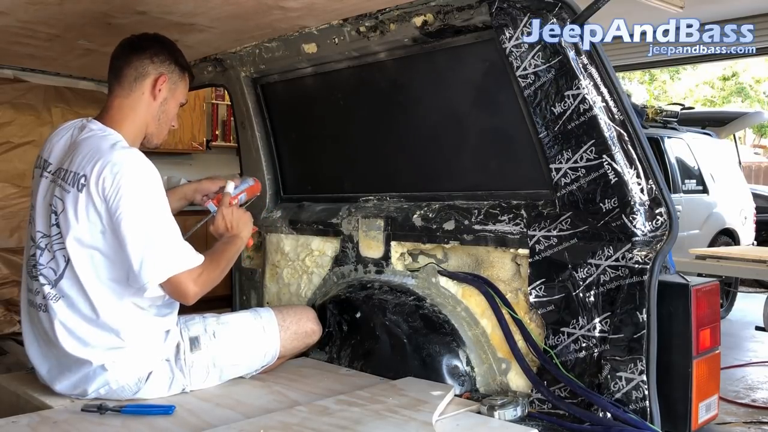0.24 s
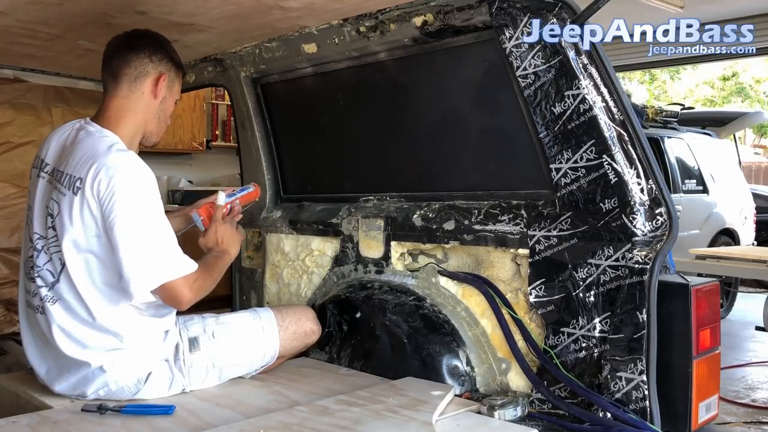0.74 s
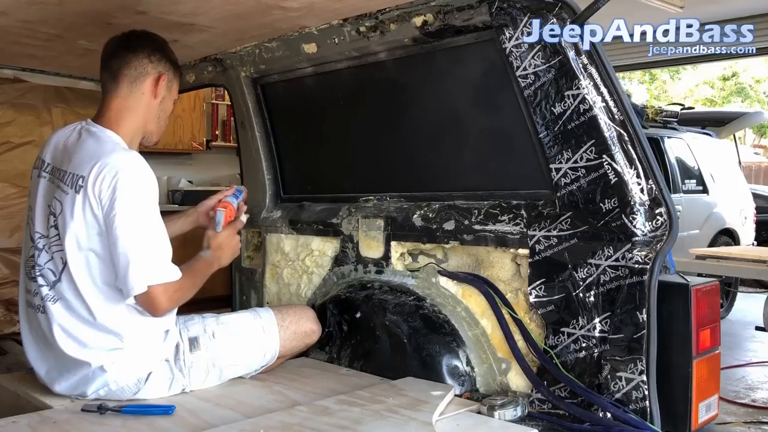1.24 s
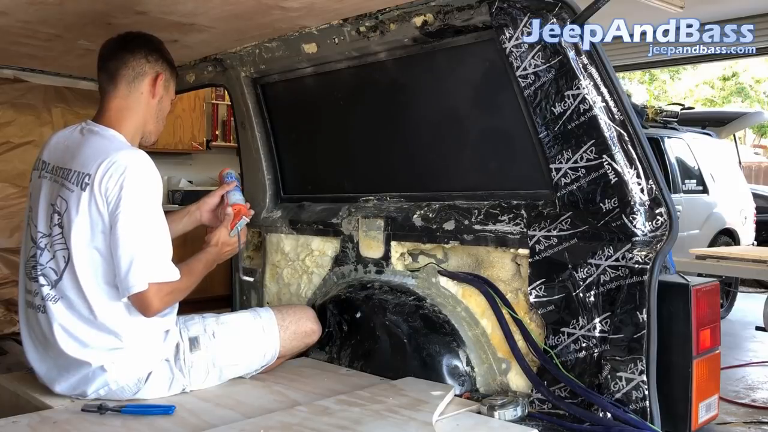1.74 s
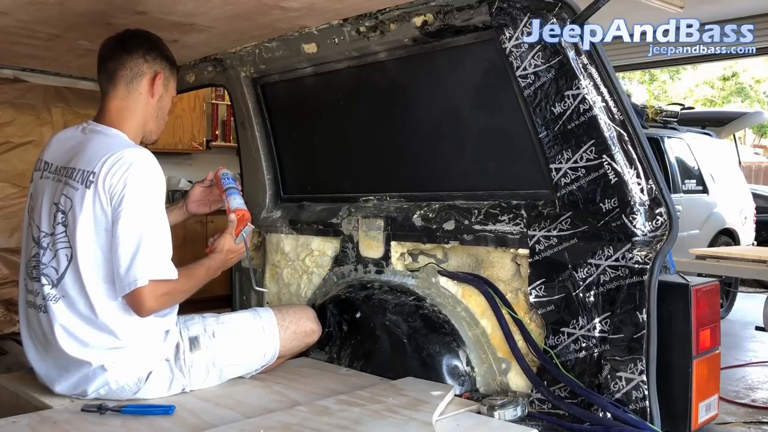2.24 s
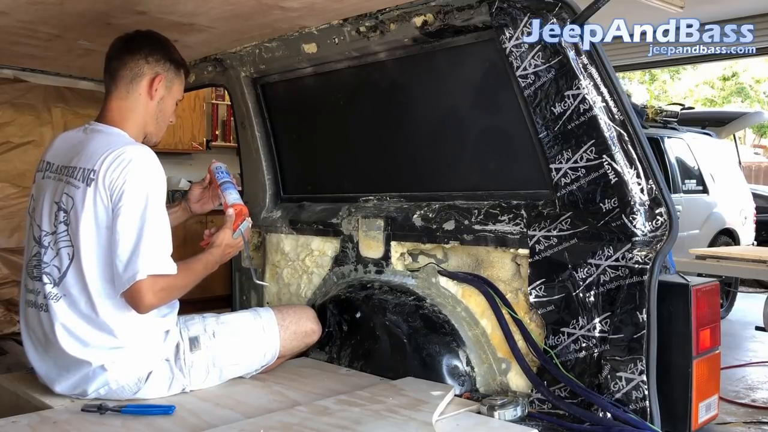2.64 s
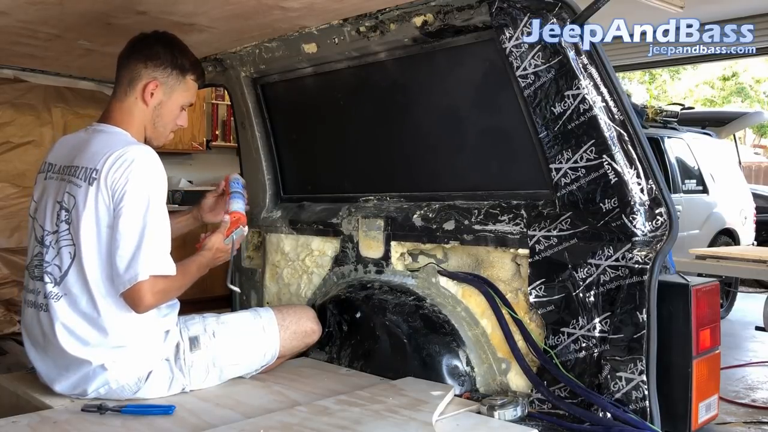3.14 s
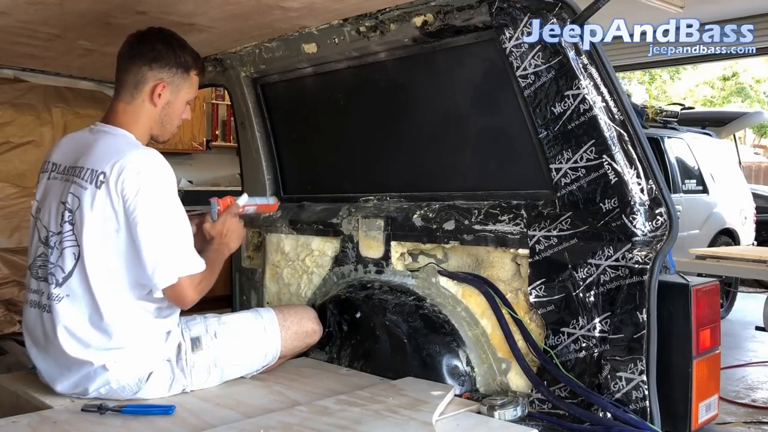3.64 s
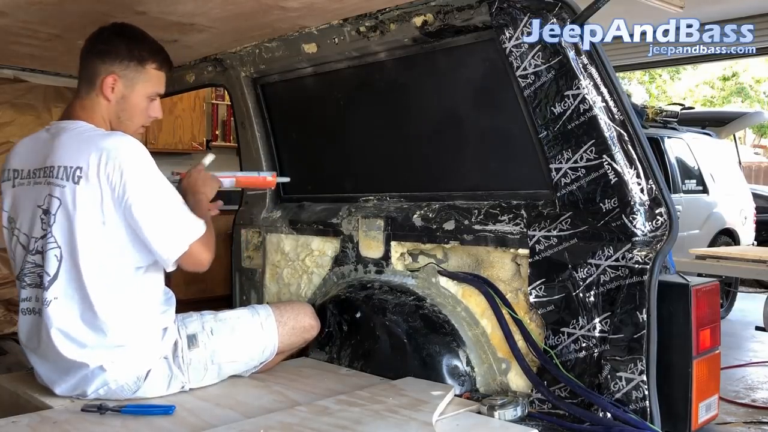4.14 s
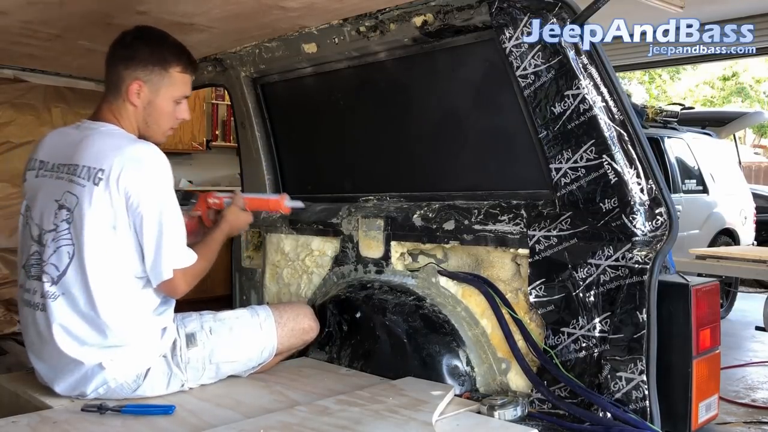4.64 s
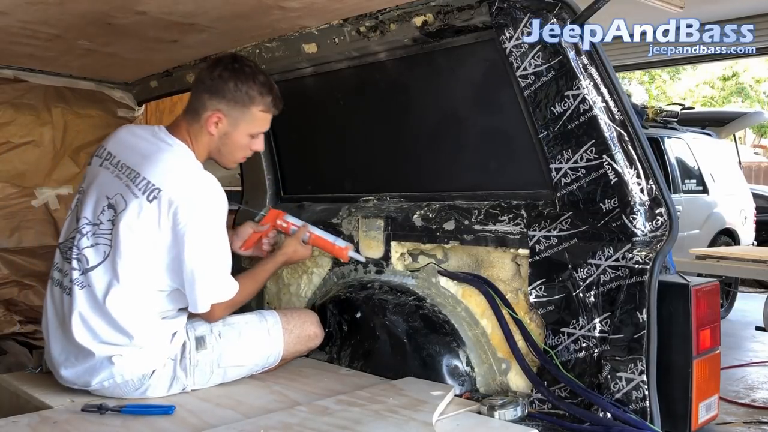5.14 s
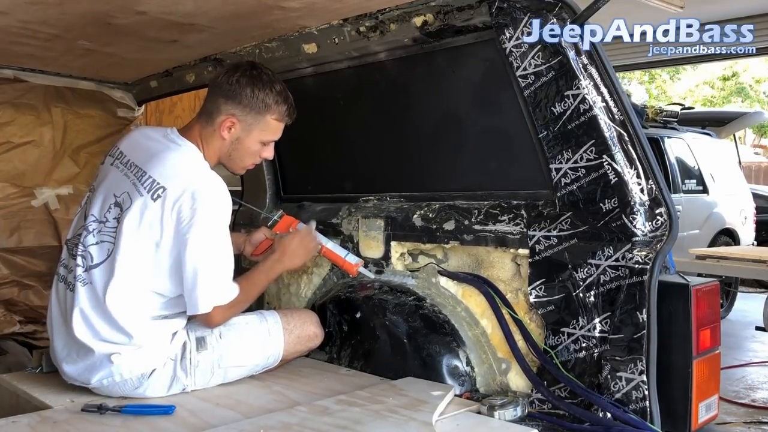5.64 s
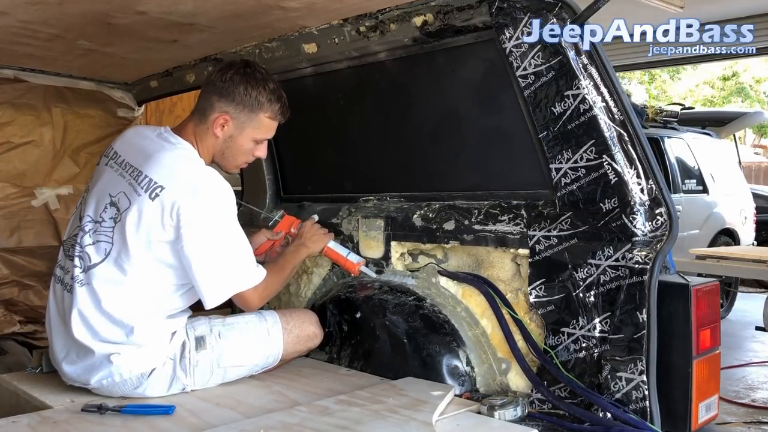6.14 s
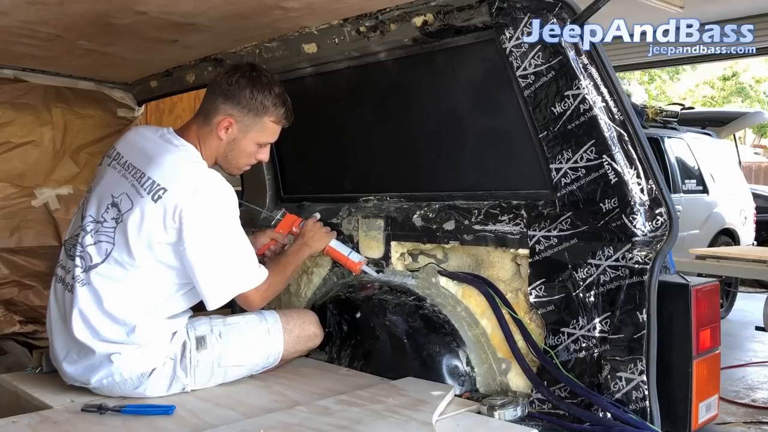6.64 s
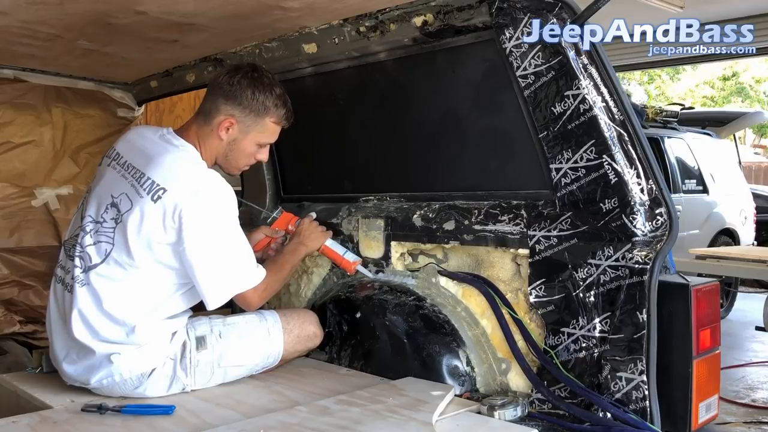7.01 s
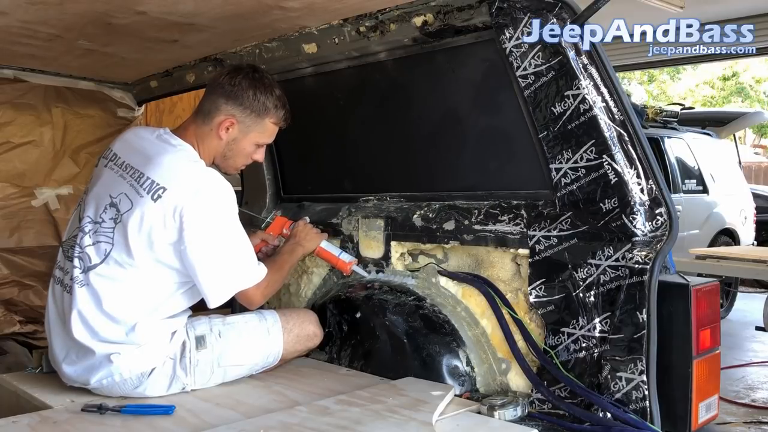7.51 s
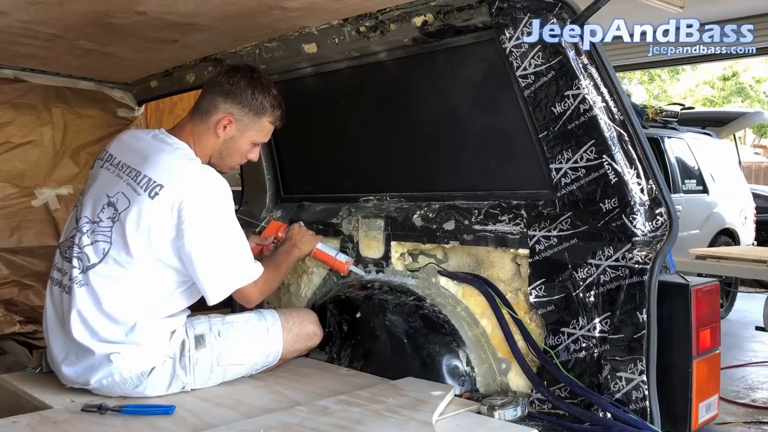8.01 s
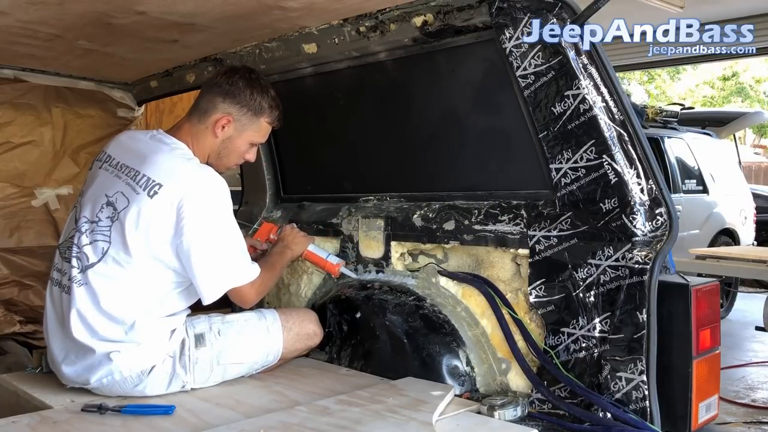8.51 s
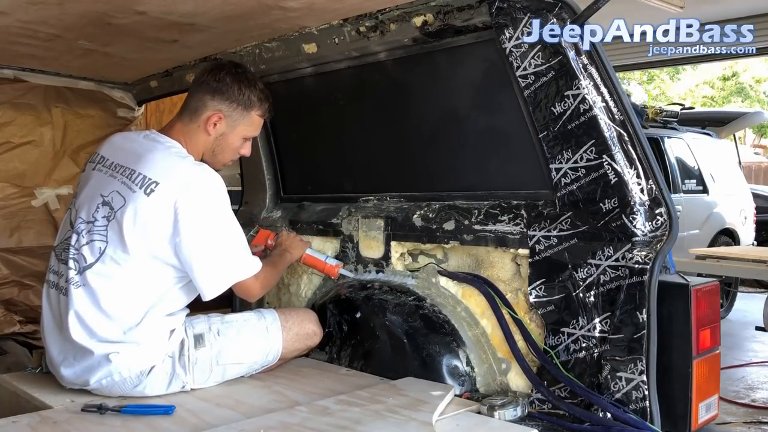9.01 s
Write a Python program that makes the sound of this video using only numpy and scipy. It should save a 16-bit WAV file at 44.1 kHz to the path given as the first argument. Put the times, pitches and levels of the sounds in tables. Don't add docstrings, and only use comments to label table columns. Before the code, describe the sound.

Throughout, a fan motor hums low near 120 Hz with slight flutter, thin whine and smooth air hiss. The gun is close, in a van shell with a short tail. At 0.1 s a hard steel knock, at 0.3 a second rattling one, then faint taps. From 1.0 to 1.9 s the empty gun is pumped in quick bursts: bright clacks, gritty rod scrapes, piercing brief squeals around 3 kHz and beating metallic ringing, the loudest distorting. From 2 to 4 s only faint ticks and a small slide at 3.6. Clicks gather from 4 s, with louder clacks at 4.8-5.1. A dull low panel thump comes at 5.5. From 5.4 to 9 s, dry lower-pitched trigger cracks arrive every few tenths of a second, with sharp scraping release clacks at 6.9, 7.9 and, loudest, 9.1, ending in a small squeak.

```python
import sys
import numpy as np
from scipy import signal
from scipy.fft import rfft, irfft
from scipy.io import wavfile
from scipy.ndimage import uniform_filter1d

SR = 44100
rng = np.random.default_rng(int(sys.argv[2]) if len(sys.argv) > 2 else 0)


def log_audio(samples):
    frames = np.atleast_2d(samples).T
    limited = np.clip(frames, -1, 1)
    pcm = np.round(limited * 32767).astype(np.int16)
    wavfile.write(sys.argv[1], SR, pcm)


def rack_gain(trim_db):
    fader = np.asarray(trim_db, float)
    return 10 ** (fader / 20)


N = 408807
PORTS = np.array([[1], [-1]])

# frequency in Hz, width in Hz, level in dB.
EMPTY_GUN = [(1150, 40, -5), (1960, 166, 6.5), (3200, 79, -5), (4000, 790, 2.5), (4600, 450, -2.5),
             (6020, 560, -9.5)]
# frequency in Hz, width in Hz, level in dB.
LOADED_GUN = [(1630, 210, 0.5), (2222, 100, 8), (2550, 200, -8.5), (3280, 200, -5), (4100, 300, -10),
              (4400, 200, -14), (5360, 110, -38)]


def level(x, db):
    return x * rack_gain(db) / np.sqrt(np.mean(x ** 2))


def band(x, lo_hz, hi_hz):
    return signal.sosfilt(signal.butter(2, [lo_hz, hi_hz], "band", fs=SR, output="sos"), x)


def resonate(x, peaks):
    out = 0
    for k, (hz, width, db) in enumerate(peaks):
        out = out + (-1) ** k * rack_gain(db) * signal.lfilter(*signal.iirpeak(hz, hz / width, SR), x)
    return out


def add(track, s, sound):
    i = int(s * SR)
    track[i:i + len(sound)] += sound[:N - i]


def fade(t, t60):
    return np.exp(-np.log(1000) * t / np.clip(t60, .01, .6))


def drift(size):
    return level(uniform_filter1d(rng.standard_normal(N), size=size), 0)


def flutter(depth_db, size):
    return level(rack_gain(depth_db * drift(size)), 0)


def coloured(*spectra):
    hz = np.log(np.fft.rfftfreq(N, 1 / SR) + 1)
    db = 0
    for spectrum in spectra:
        edge_hz, edge_db = np.transpose(spectrum)
        db = db + np.interp(hz, np.log(edge_hz), edge_db)
    return irfft(rfft(rng.standard_normal(N)) * rack_gain(db), N)


def fan():
    # shaft turns added to the magnetic pull, rms level in dB.
    hum_lines = [(-1, -45), (0, -45.5), (1, -36.7), (2, -48), (3, -53)]
    # frequency in Hz, width in Hz, rms level in dB.
    whines = [(530, 2.8, -62), (2090, 120, -55), (8800, 23, -53.5), (8480, 790, -52)]
    # frequency in Hz, level in dB per Hz.
    air_spectrum = [(25, -37), (60, -13), (110, -13.5), (200, -16), (363, -21), (463, -26), (911, -29),
                    (1890, -31.5), (2800, -33), (5000, -33.5), (6560, -32), (8830, -23), (11500, -30),
                    (14000, -32)]
    # frequency in Hz, side level in dB re mid.
    side_spectrum = [(60, -64), (200, -30), (380, -16), (700, -22), (2380, -12), (8120, -21), (12000, -13),
                     (15000, -12)]
    pull_hz, shaft_hz = 119.8, 18.37
    whistle_hz, whistle_db = 2005, -60
    air_db, side_db = -36, 6
    lean_rad, spread = .07, .22

    t = np.arange(N) / SR
    wander = 0.34 * drift(9000)
    out = np.sqrt(2) * rack_gain(whistle_db) * np.sin(2 * np.pi * whistle_hz * t + 3 * wander)
    for k, db in hum_lines:
        phase = k * wander + 0.73 * k * k + lean_rad * PORTS
        out = out + np.sqrt(2) * rack_gain(db) * np.sin(2 * np.pi * (pull_hz + k * shaft_hz) * t + phase)
    for hz, width, db in whines:
        rumble = rng.standard_normal(N) + spread * PORTS * rng.standard_normal(N)
        out = out + level(resonate(rumble, [(hz, width, 0)]), db)
    air, side = coloured(air_spectrum), coloured(air_spectrum, side_spectrum)
    return out + rack_gain(air_db) / np.std(air) * (air + rack_gain(side_db) * side * PORTS)


def blows(table, frame, decay_s, usual_ring_db, crack_s, crack_db, broad_db, frame_db, snap_db,
          ring_share, treble_share, air_db, top_hz, size, hardness, rise_s=0.0008):
    t, noise = np.arange(int(.3 * SR)) / SR, rng.standard_normal((2, N))
    shape, treble, rings, snaps = np.zeros((4, N))
    for s, db, hz, treble_db in table:
        harder_db = db + 15
        t60 = decay_s * np.exp(-0.04 * harder_db)
        ring_db = usual_ring_db - 0.1674 * harder_db
        crack = rack_gain(crack_db) * fade(t, crack_s)
        rise = np.minimum(t / rise_s, 1)
        add(shape, s, rack_gain(db) * rise * (crack + fade(t, t60)))
        add(snaps, s + 0.00024, rack_gain(hardness * db + snap_db) * np.hanning(size) / size)
        add(treble, s, rack_gain(db + treble_db) * rise * (crack + fade(t, treble_share * t60)))
        tone = np.sin(2 * np.pi * hz * t) + rack_gain(-8.5) * np.sin(2 * np.pi * 1.17 * hz * t)
        ring_rise = np.minimum(t / (0.3 * rise_s), 1)
        add(rings, s, rack_gain(db + ring_db) * fade(t, ring_share * t60) * ring_rise * tone)
    chatter = rack_gain(2.0 * drift(70))
    push = shape * chatter * noise[0] + snaps
    body = rack_gain(broad_db) * band(push, 1290, 4740) + rack_gain(frame_db) * resonate(push, frame)
    hiss = band(treble * chatter * noise[1], 3200, top_hz)
    hiss = rack_gain(air_db) * band(hiss, 2700, min(1.3 * top_hz, 20000))
    return body + hiss + rings * np.sqrt(uniform_filter1d(chatter, size=60))


def clacks():
    # start in seconds, peak in dB, ring in Hz, treble in dB re peak.
    handling = [
        (0.0184, -27, 1920, -23),
        (0.0787, 3.5, 3500, -22),
        (0.0944, -26, 3800, -15.5),
        (0.3474, -10.5, 3830, -13.5),
        (0.3614, -9.5, 2190, -10),
        (0.382, -17, 3000, -7),
        (0.762, -25, 2470, -13),
        (0.8565, -27.5, 2450, -8),
        (0.9113, -21, 1750, -3),
        (0.9298, -25, 1820, -32),
    ]
    # start in seconds, peak in dB, ring in Hz, treble in dB re peak.
    pumping = [(0.9813, -15, 3410, -23), (1.008, -10, 3370, -16), (1.0226, -16, 3520, -8),
               (1.161, -22, 4520, -7), (1.1806, -15, 4830, -11.5), (1.194, -9.5, 3200, -4),
               (1.259, -21, 3000, -18), (1.277, -12, 3280, -16), (1.3066, -7, 4100, -3),
               (1.467, -11, 4600, 1), (1.4782, -4, 2080, 0), (1.5335, -14, 4520, -11),
               (1.5514, -20, 2000, -21), (1.562, -5.5, 3020, -13.5), (1.5887, -5.5, 3280, -18),
               (1.602, -19, 3270, -8.5), (1.7768, -13, 3940, -20), (1.805, -19.5, 2690, -6),
               (1.81, -10, 2890, -16.5), (1.8163, -3, 3850, -23), (1.828, -10, 3140, -18)]
    return blows(handling + pumping, EMPTY_GUN, decay_s=0.071, usual_ring_db=-5.0, crack_s=0.026, crack_db=-1.0,
                 broad_db=-6.5, frame_db=-5, snap_db=8, ring_share=0.48, treble_share=0.93,
                 air_db=-7.5, top_hz=11730, size=3, hardness=1.4)


def scrapes():
    # start in seconds, length in seconds, rms level in dB, centre in Hz, treble in dB re level.
    strokes = [(0.063, 0.052, -25, 2900, -4), (0.285, 0.15, -28, 1880, -21),
               (0.968, 0.085, -27.5, 2820, -22), (1.164, 0.074, -22, 3270, -10),
               (1.249, 0.13, -25, 3740, -6.5), (1.452, 0.068, -21, 3000, -9), (1.525, 0.1, -25, 2800, -8),
               (1.692, 0.085, -25, 2620, -6.5), (1.78, 0.074, -21, 2730, -4), (1.845, 0.46, -48, 3000, -24),
               (3.591, 0.08, -40, 2500, -14), (4.776, 0.12, -35, 2190, -9), (5.02, 0.045, -35, 2630, 1),
               (5.073, 0.1, -47, 2080, -13), (6.842, 0.059, -27.5, 4300, -18),
               (7.915, 0.055, -23.5, 3060, -2.5), (9.081, 0.11, -24.5, 2900, 1)]
    out = np.zeros(N)
    grains = rng.standard_normal(N) * rack_gain(3.3 * drift(130))
    for s, length, db, hz, treble_db in strokes:
        u = np.linspace(0, 1, int(length * SR))
        rub = grains[int(s * SR):][:len(u)]
        mid = level(band(rub, 0.35 * hz, 1.89 * hz), db)
        mid = mid + rack_gain(1.5) * resonate(mid, EMPTY_GUN)
        rasp = level(band(rub, 5100, 10900), db + treble_db)
        add(out, s, np.sin(np.pi * u ** 0.84) ** 2.4 * (mid + rasp))
    return out


def thuds():
    # start in seconds, frequency in Hz, peak in dB, decay in seconds, rattle in dB re peak.
    pings = [(0.0768, 1920, -19, .06, 1), (0.093, 3860, -21, .06, 3), (0.100, 3650, -24, 0.031, 1),
             (0.094, 1920, -25, 0.07, 5), (0.11, 3200, -36, 0.043, -2), (0.3463, 3820, -17, .04, 2),
             (0.351, 2143, -17.5, .06, 5), (0.385, 5020, -24, .05, 6), (0.392, 3200, -25.5, 0.049, 6),
             (0.421, 2290, -30, .05, 3), (0.982, 1980, -23, 0.043, 4), (0.981, 4200, -23, 0.045, 1),
             (0.99, 3600, -24, .12, 10), (1.89, 2950, -30, .15, 3), (3.985, 1480, -33, .12, 3),
             (4.2, 3800, -30, .05, 3), (4.515, 4050, -36, .1, 3), (1.004, 900, -36, 0.14, 6.5),
             (1.166, 5200, -33, 0.037, 0), (1.457, 4500, -23, .06, 5), (1.479, 4490, -10, 0.037, 7),
             (1.568, 1953, -19, .12, 4), (1.612, 3300, -25, 0.076, 6.5), (1.632, 3280, -27, .1, 6),
             (1.777, 1984, -20, 0.052, 3.5), (1.799, 3920, -12.5, .03, 3), (1.817, 1700, -22, 0.061, 10),
             (1.846, 3170, -26, 0.076, 1), (3.304, 2230, -36, 0.045, 5), (4.894, 1600, -19, .03, 0),
             (4.945, 3150, -34, .1, 3), (5.025, 1560, -29, 0.069, -1), (6.585, 1460, -26, 0.052, 2.5),
             (6.889, 1486, -24, .06, 4), (7.188, 3900, -24, .04, 6), (7.188, 2900, -24, .05, 6),
             (7.839, 2593, -19.5, 0.032, 4), (7.922, 1613, -25, 0.13, 3.5), (9.027, 2500, -28, 0.11, 3),
             (9.128, 3090, -12, .04, 3)]
    # start in seconds, frequency in Hz, peak in dB, decay in seconds, rattle in dB re
    panels = [(.079, 643, -31, 0.05, 10), (0.319, 361, -36, 0.38, 7), (0.318, 1150, -19.5, 0.08, 9),
              (.348, 1150, -18, 0.05, 12), (.349, 590, -40, 0.046, -12), (1.477, 11680, -12, 0.083, 4),
              (1.530, 11800, -22, 0.097, 3), (0.081, 1666, -16.5, 0.078, 4), (3.616, 1750, -29, .06, 2),
              (1.829, 3180, -34, 0.73, 12), (3.674, 1750, -46, 0.079, 5), (4.894, 3130, -42, 0.48, -22),
              (4.788, 12500, -27, 0.12, -12), (5.52, 225, -21, 0.063, -10), (5.536, 180, -18.5, 0.11, -12),
              (5.549, 285, -22, 0.076, -2), (5.552, 1280, -27, 0.06, 13), (5.551, 843, -39, 0.15, 0),
              (5.575, 1150, -39, 0.28, -2), (5.610, 211, -26.5, 0.043, -1), (6.030, 1490, -40, 0.52, -11),
              (7.030, 855, -37.5, 0.057, 9.5), (8.360, 820, -31, 0.066, 3)]
    out, t = np.zeros(N), np.arange(int(.25 * SR)) / SR
    noise = np.tile(rng.standard_normal(N), 2)
    for s, hz, db, t60, rattle_db in panels + pings:
        rattle = level(band(noise[int(s * SR):][:len(t)], 0.72 * hz, 1.195 * hz), rattle_db - 10.0)
        mode = np.sin(2 * np.pi * hz * t)
        add(out, s, rack_gain(db) * fade(t, t60) * np.minimum(t / 0.0012, 1) * (mode + rattle))
    return out


def nudges():
    # start in seconds, peak in dB, ring in Hz, treble in dB re peak.
    contacts = [(0.311, -20, 1900, -11), (0.3165, -10, 2030, -12), (0.323, -15, 2180, -10),
                (1.7083, -21.5, 2300, -9), (1.7153, -13, 5710, -7), (1.7203, -14, 2460, -7.5),
                (1.735, -15, 2300, -10.5), (1.746, -16.5, 1900, -12), (1.7535, -18, 2490, -11),
                (3.606, -36, 1630, -15), (3.6155, -23.5, 4000, -10), (3.629, -34.5, 2160, -12),
                (3.652, -34, 1750, -8), (3.672, -34, 2060, -6), (3.681, -40, 1800, -6),
                (5.0245, -19, 2190, -25), (5.0405, -18.5, 4500, -14), (5.0472, -17, 1630, -7),
                (5.055, -25, 3430, -14), (5.0675, -9, 2620, -16), (5.074, -16, 1750, -18),
                (6.856, -26, 4400, -11), (6.873, -14, 2400, -10), (7.947, -8, 2660, -5),
                (7.953, -15, 1594, -2), (9.116, -17, 1300, -5), (9.136, -12, 2800, -5)]
    return blows(contacts, LOADED_GUN, decay_s=0.059, usual_ring_db=-5, crack_s=0.022, crack_db=-4,
                 broad_db=-8.5, frame_db=-7, snap_db=-20, ring_share=0.67, treble_share=1.0,
                 air_db=-0.5, top_hz=9000, size=3, hardness=1.3, rise_s=0.0022)


def rod():
    # start in seconds, level in dB.
    strikes = [
        (1.008, -21),
        (1.028, -12.5),
        (1.291, -27),
        (1.312, -17),
        (1.05, -18),
        (1.33, -20),
        (1.580, -22),
        (1.812, -28),
    ]
    # frequency in Hz, level in dB, decay in seconds.
    modes = [(3160, -14, .28), (3343, 0, .45), (3429, -5, .32), (3540, -12, .45)]
    jolts = np.zeros(N)
    for s, db in strikes:
        add(jolts, s, rack_gain(db) * np.hanning(220) * rng.standard_normal(220))
    ring = resonate(jolts, [(hz, np.log(1000) / np.pi / t60, db + 50.5) for hz, db, t60 in modes])
    return rack_gain(-14) * ring * flutter(depth_db=1.8, size=130)


def squeals():
    # start in seconds, length in seconds, first Hz, last Hz, peak in dB.
    smooth = [(1.009, 0.043, 3460, 3330, -17), (4.863, 0.015, 3200, 3130, -15),
              (4.878, 0.01, 3150, 3100, -24), (1.021, 0.02, 3300, 3200, -14),
              (1.286, 0.0084, 3110, 3200, 0), (1.2957, 0.0045, 3200, 3300, 0),
              (1.3025, 0.004, 3250, 3430, -11), (1.306, 0.0115, 3370, 3005, 4.5),
              (1.319, 0.0045, 3200, 3200, -9), (1.322, 0.016, 3210, 3400, -18),
              (1.345, 0.005, 3420, 3400, -20), (1.83, 0.008, 8400, 8350, -24),
              (1.841, 0.011, 8500, 8400, -22), (1.587, 0.024, 8300, 8350, -27),
              (6.87, 0.011, 4200, 4400, -22)]
    # start in seconds, length in seconds, first Hz, last Hz, peak in dB.
    shrieks = [
        (1.01, 0.014, 3280, 3280, -14.5),
        (1.575, 0.012, 3430, 3260, -6),
    ]
    # start in seconds, length in seconds, first Hz, last Hz, peak in dB.
    sighs = [
        (5.048, 0.024, 1633, 1650, -23),
        (7.947, 0.028, 1596, 1600, -20),
        (9.139, 0.035, 1620, 1618, -16),
        (1.036, 0.03, 3090, 3000, -15.5),
        (1.8005, 0.015, 2877, 2904, -4),
    ]
    voices = [(smooth, -17.5, 0.97), (sighs[:-1], -17.5, 0.55), (shrieks + sighs[-1:], -2.5, 0.85)]
    out, waver = np.zeros(N), drift(40)
    for rows, second_db, skew in voices:
        for s, length, first_hz, last_hz, db in rows:
            u = np.linspace(0, 1, int(length * SR))
            rough = waver[int(s * SR):][:len(u)]
            hz = (first_hz + (last_hz - first_hz) * u) * (1 + 0.0165 * rough)
            turn = 2 * np.pi * np.cumsum(hz) / SR
            tone = np.sin(turn) + rack_gain(second_db) * np.sin(2 * turn)
            tone = tone + rack_gain(0.69 * second_db - 8.5) * np.sin(3 * turn)
            swell = np.sin(np.pi * u ** skew) ** 0.8 * (1 + 0.25 * rough[::-1])
            add(out, s, rack_gain(db) * swell * tone)
    return out


def ticks():
    # start in seconds, peak in dB, ring in Hz, treble in dB re peak.
    releases = [(2.059, -34, 1470, 0), (2.1294, -50, 1470, 6), (2.1894, -40, 1460, 5),
                (3.304, -28, 3200, -25), (3.798, -32, 2080, -18), (3.9794, -19.5, 1612, -22),
                (4.1994, -28, 4500, 2), (4.249, -30, 1470, -18), (4.367, -35, 2090, -12),
                (4.51, -25.5, 2520, -5), (4.5804, -18, 4560, -10), (4.6568, -21.5, 3750, -10),
                (4.787, -26, 1700, -4), (4.8244, -12.5, 1960, -17), (4.8918, -6, 2350, -11),
                (5.154, -30.5, 3500, 0), (5.1794, -30, 2090, -16), (6.8787, -6.5, 1310, -9),
                (7.921, -17, 1670, -25), (7.9373, -3, 2740, -5), (9.1075, -0.5, 2730, -2.5),
                (9.128, -2, 4200, -5.5)]
    return blows(releases, LOADED_GUN, decay_s=0.1, usual_ring_db=-11.5, crack_s=0.016, crack_db=1.5,
                 broad_db=-12, frame_db=-6.5, snap_db=14, ring_share=0.43, treble_share=0.96,
                 air_db=-6.5, top_hz=10100, size=3, hardness=1.8)


def bites():
    # start in seconds, peak in dB, ring in Hz, treble in dB re peak.
    pulls = [(5.3944, -12, 2100, -16), (5.975, -26.5, 1590, -8), (6.0227, -18, 2500, -25),
             (6.2408, -13.5, 1560, -5.5), (6.492, -22, 2170, -14), (6.5398, -30.5, 1430, -6),
             (6.5762, -14.5, 1500, -1.5), (6.783, -19.5, 1410, -17), (6.821, -19.5, 3050, -19),
             (7.1868, -17, 2230, -8), (7.3504, -17.5, 2620, -14), (7.5015, -15.5, 1445, -10),
             (7.632, -16.5, 2550, -19), (7.838, -10.5, 1540, -28), (8.219, -24, 2550, -27),
             (8.318, -19.5, 1490, -15), (8.35, -33, 1130, -6), (8.438, -19, 1713, -9),
             (8.617, -30, 1360, -9), (8.7286, -17, 1440, -19), (8.8604, -15, 1460, -25),
             (9.0265, -12, 1445, -29)]
    # frequency in Hz, width in Hz, level in dB.
    tensed_gun = [(1471, 100, 4), (1750, 110, -0.5), (2190, 110, -3), (2550, 140, 2.5), (3110, 150, -11),
                  (3900, 250, -9.5), (4200, 120, -15), (5350, 190, -27)]
    return blows(pulls, tensed_gun, decay_s=0.095, usual_ring_db=-9.5, crack_s=0.018, crack_db=9.5,
                 broad_db=-18.5, frame_db=-5.0, snap_db=33.5, ring_share=0.46, treble_share=0.7,
                 air_db=-7.5, top_hz=5900, size=9, hardness=1.13)


def shell(x):
    t60_s, tail_db, side_db = 0.44, -11.5, -17
    t = np.arange(int(.5 * SR)) / SR
    noise = band(rng.standard_normal((2, len(t))), 520, 13400)
    mid, side = noise * fade(t, t60_s) * np.minimum(t / 0.00038, 1)
    tails = rack_gain(tail_db) * (mid + rack_gain(side_db) * side * PORTS) / np.linalg.norm(mid)
    return signal.fftconvolve(x[None], tails, axes=1)[:, :N]


def starve(x):
    # frequency in Hz, keep level in dB re the steady floor, keep level in dB re the moment's loudness.
    thresholds = [(300, -40, -70), (420, -10, -19), (950, -8, -16), (1200, -8, -40), (2600, -2, -40),
                  (6300, -2, -40), (7500, -8, -36), (11000, -6, -30), (12500, -2.5, -19),
                  (16000, -1.5, -15)]
    hz, _, cells = signal.stft(x, SR, nperseg=1536)
    power = np.abs(cells.mean(axis=0)) ** 2
    floor = uniform_filter1d(np.median(power, axis=1), size=21)[:, None]
    loudness = power[(hz > 1000) & (hz < 8000)].mean(axis=0)
    edge, steady_db, masked_db = np.transpose(thresholds)
    steady = floor * rack_gain(2 * np.interp(hz, edge, steady_db))[:, None]
    masked = loudness * rack_gain(2 * np.interp(hz, edge, masked_db))[:, None]
    kept = np.where(uniform_filter1d(power, size=4, axis=0) > steady + masked, 1, .05)
    return signal.istft(cells * kept, SR, nperseg=1536)[1][:, :N]


def scene():
    squeal, knocks = squeals(), thuds()
    clatter = clacks() + ticks() + bites() + scrapes() + rod() + nudges()
    clatter = signal.sosfilt(signal.butter(6, 1100, "high", fs=SR, output="sos"), clatter)
    aside = rack_gain(-12.5) * band(np.roll(clatter + squeal + knocks, 41), 3900, 18000) * PORTS
    aside = aside + rack_gain(-15.5) * band(np.roll(clatter + knocks, 97), 450, 1500) * PORTS
    tail = shell(clatter + knocks + 0.42 * squeal * flutter(depth_db=3.5, size=60))
    heard = aside + clatter + squeal + knocks + tail + fan()
    return heard * rack_gain(-.15 * PORTS)


def low_pass(x):
    return signal.sosfilt(signal.butter(12, 16000, fs=SR, output="sos"), x)


def record(dry):
    overloaded = np.clip(dry, -.87, .87)
    top_cut = signal.ellip(10, .2, 80, 15900, fs=SR, output="sos")
    mix = signal.sosfilt(top_cut, starve(overloaded))
    return low_pass(mix)


dry = scene()
out = record(dry)
log_audio(out)
```